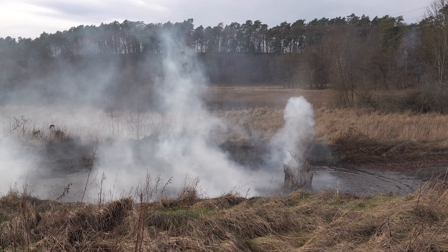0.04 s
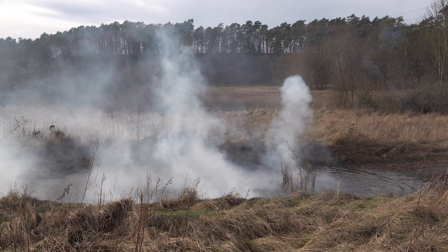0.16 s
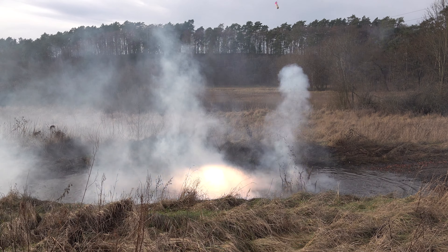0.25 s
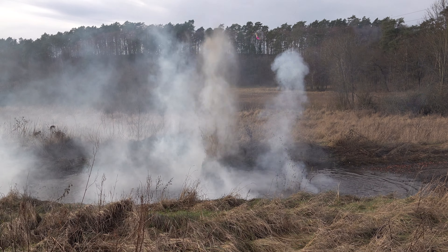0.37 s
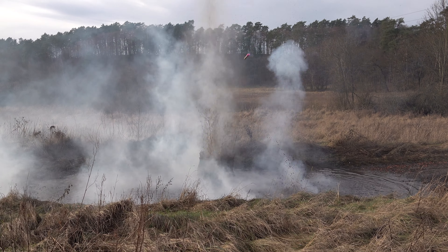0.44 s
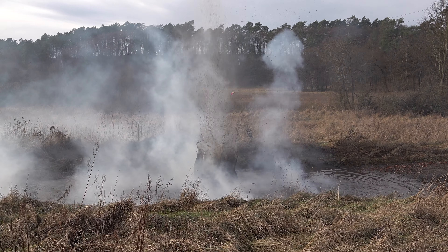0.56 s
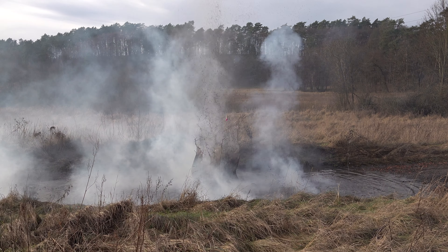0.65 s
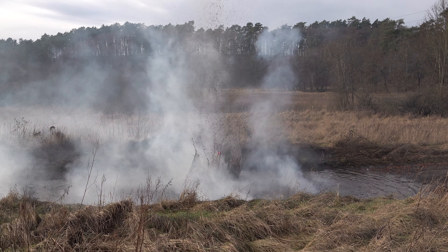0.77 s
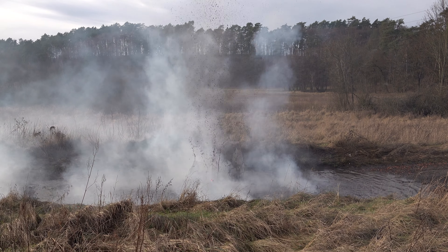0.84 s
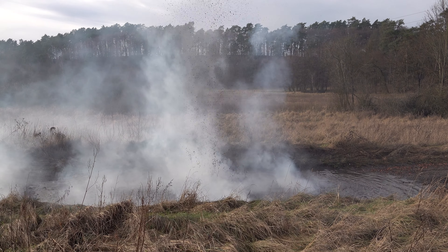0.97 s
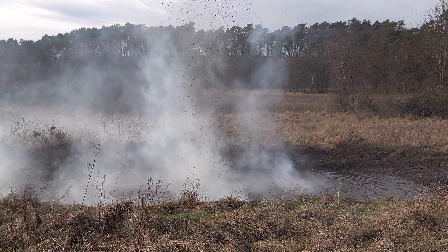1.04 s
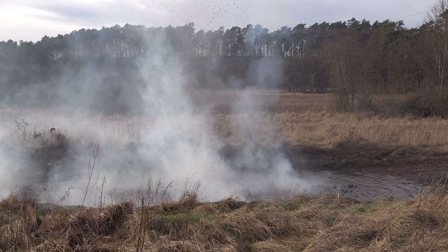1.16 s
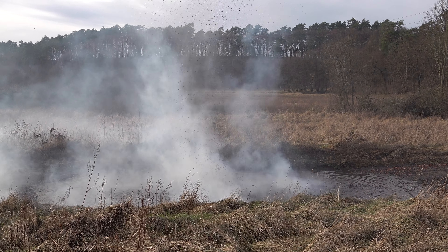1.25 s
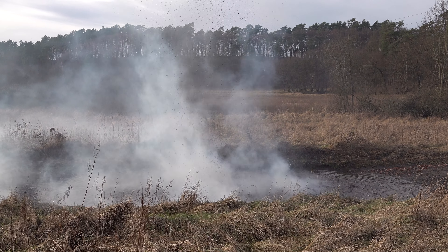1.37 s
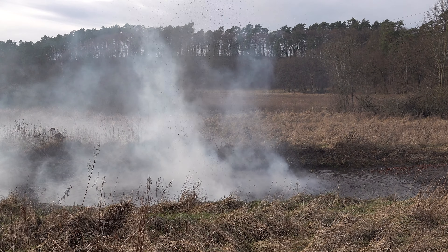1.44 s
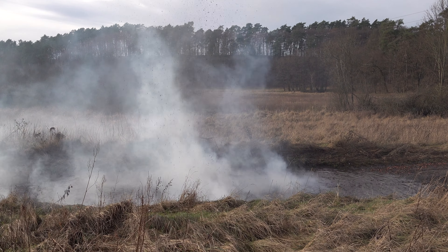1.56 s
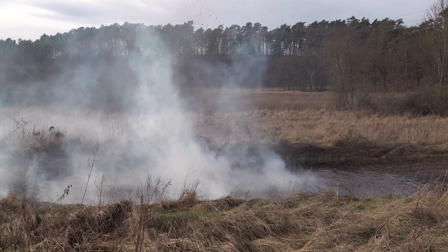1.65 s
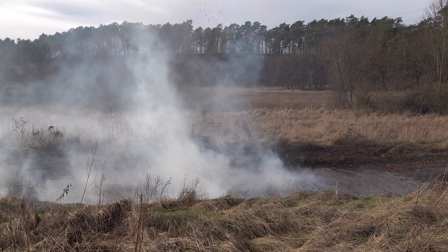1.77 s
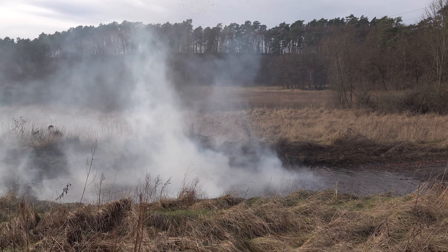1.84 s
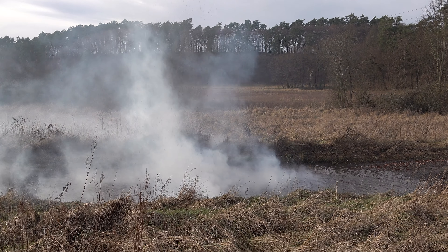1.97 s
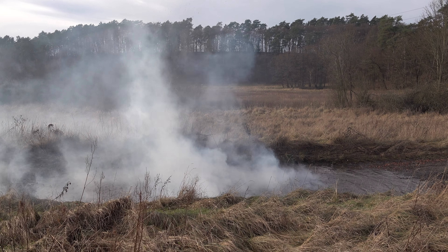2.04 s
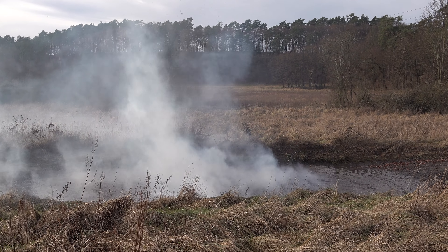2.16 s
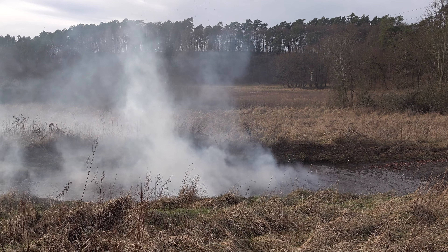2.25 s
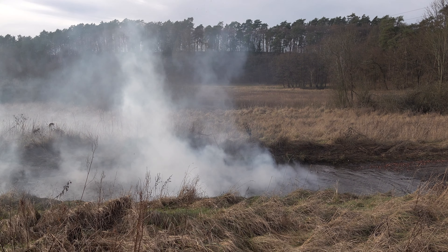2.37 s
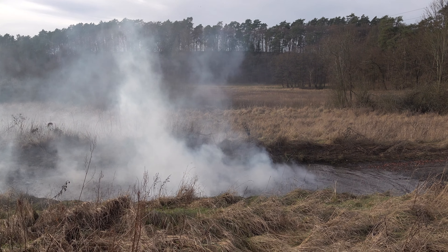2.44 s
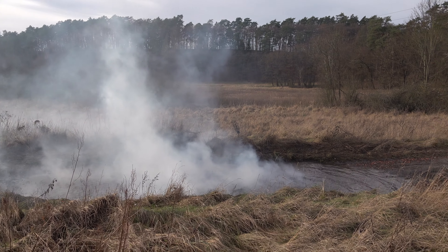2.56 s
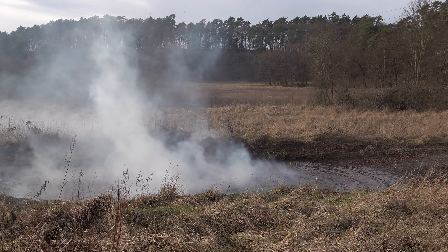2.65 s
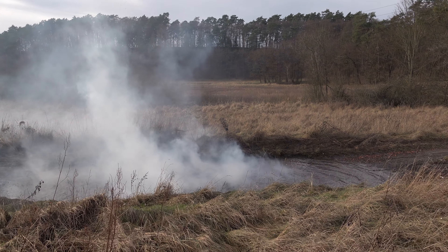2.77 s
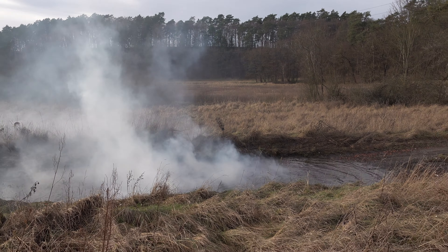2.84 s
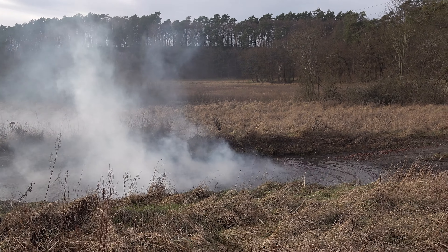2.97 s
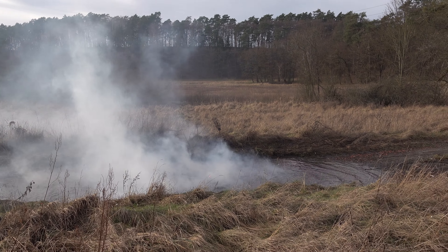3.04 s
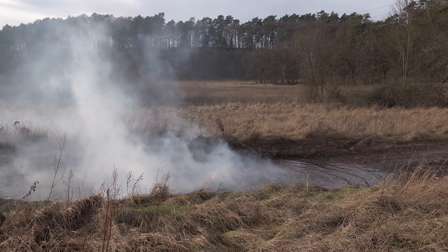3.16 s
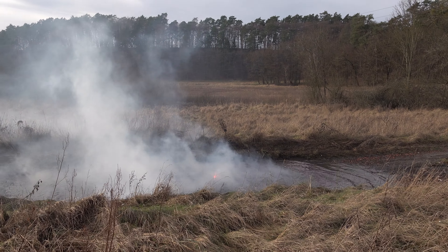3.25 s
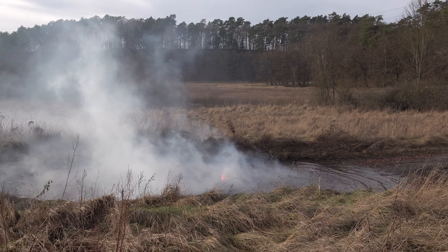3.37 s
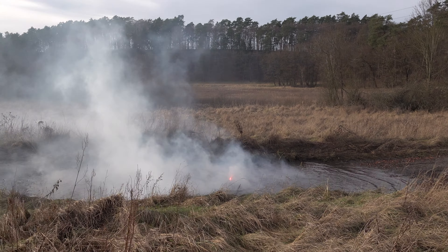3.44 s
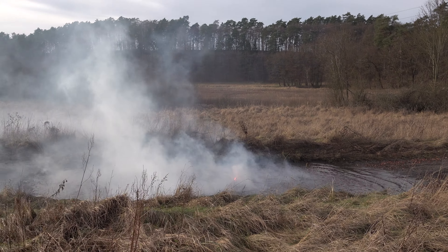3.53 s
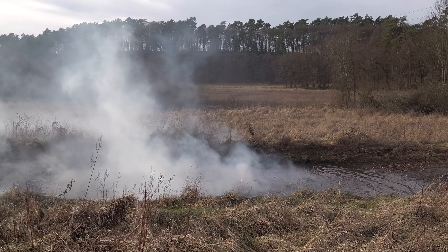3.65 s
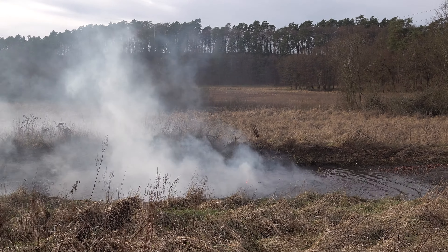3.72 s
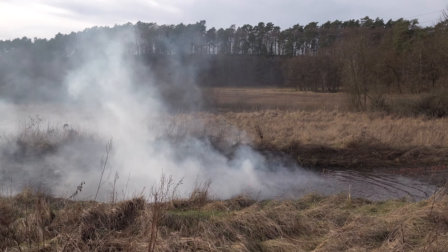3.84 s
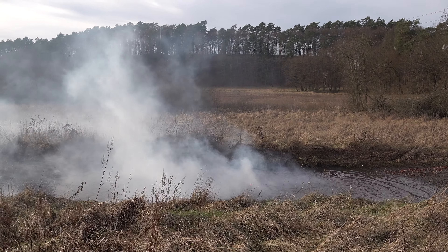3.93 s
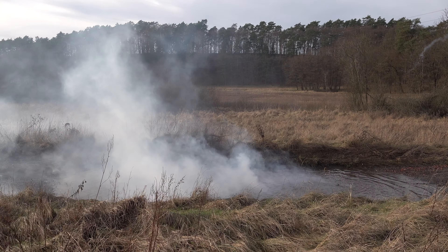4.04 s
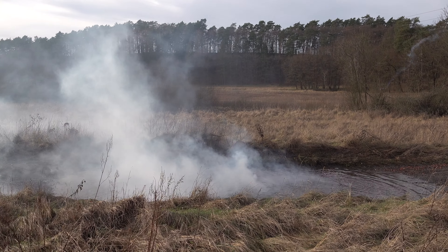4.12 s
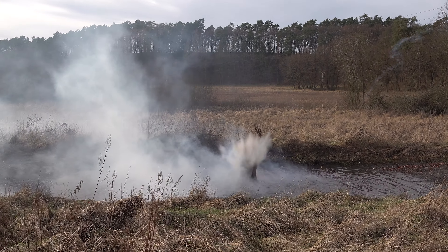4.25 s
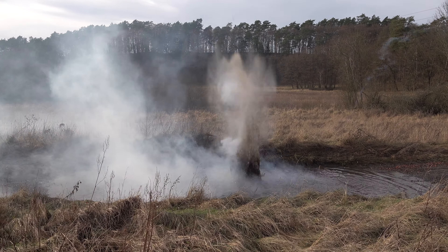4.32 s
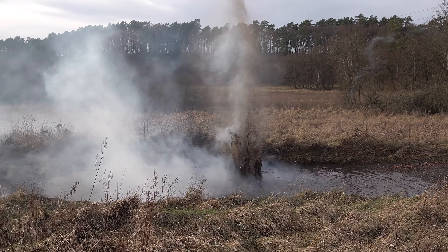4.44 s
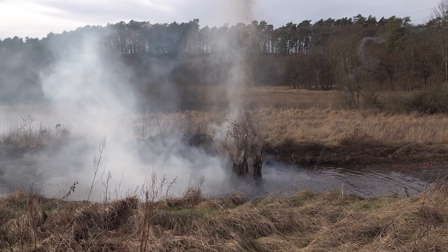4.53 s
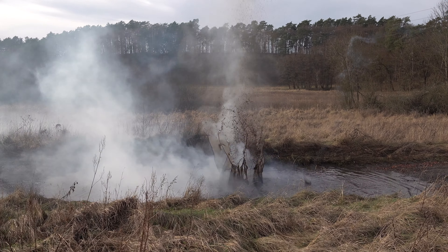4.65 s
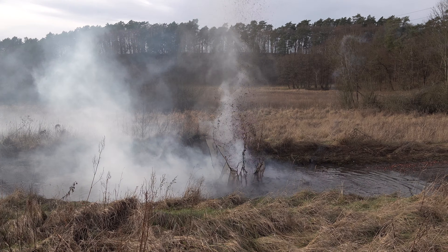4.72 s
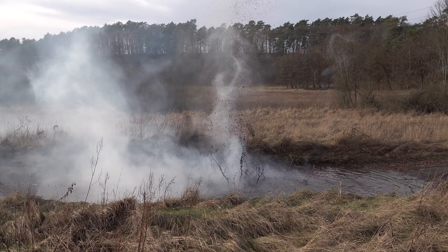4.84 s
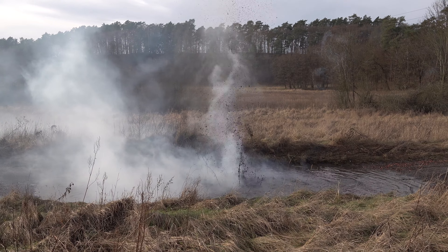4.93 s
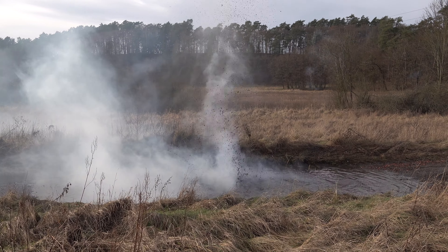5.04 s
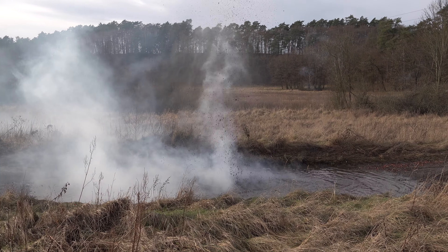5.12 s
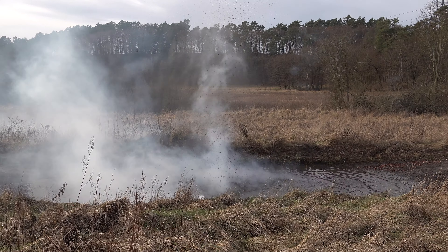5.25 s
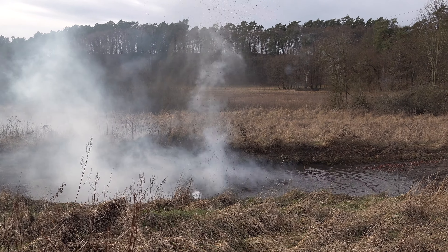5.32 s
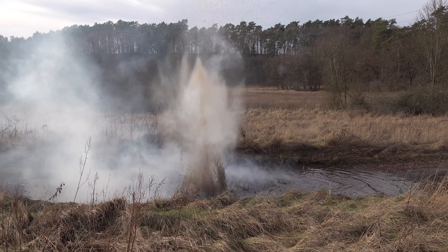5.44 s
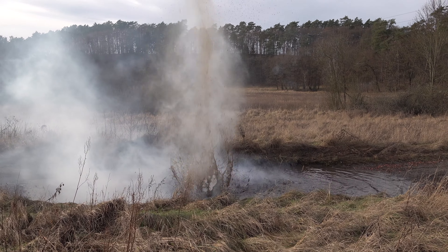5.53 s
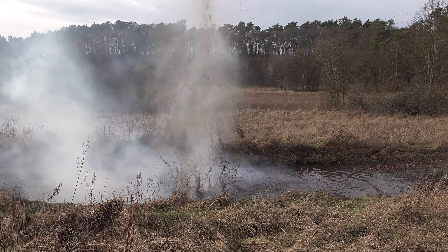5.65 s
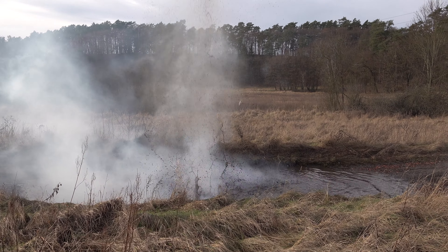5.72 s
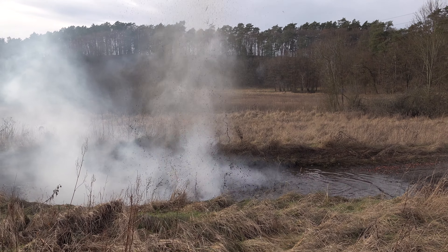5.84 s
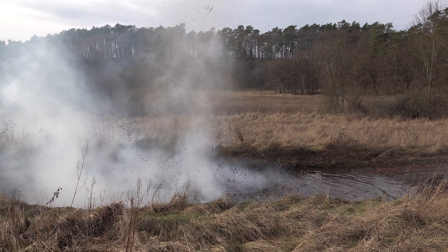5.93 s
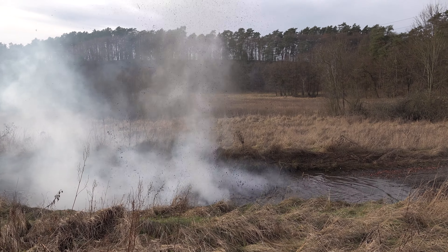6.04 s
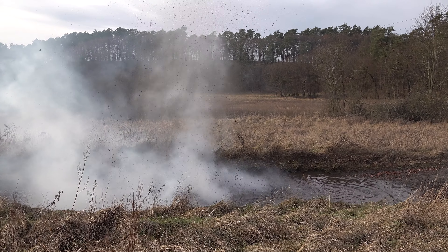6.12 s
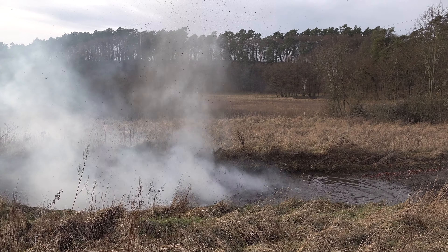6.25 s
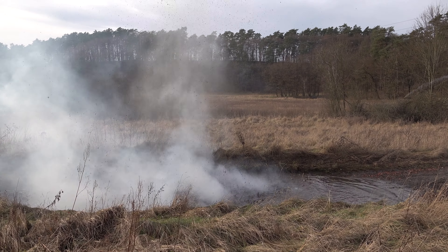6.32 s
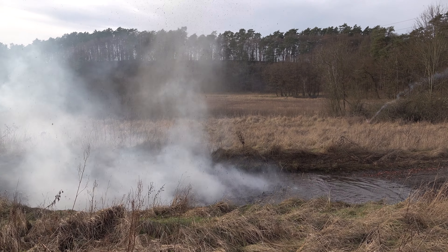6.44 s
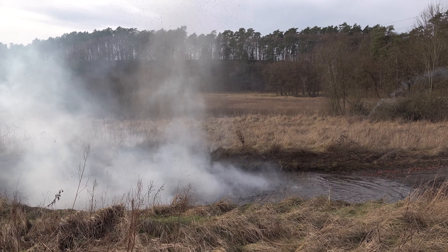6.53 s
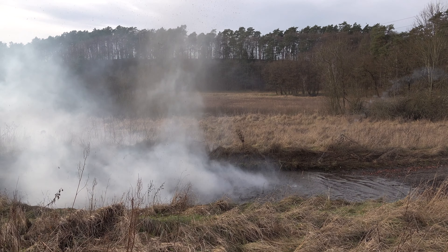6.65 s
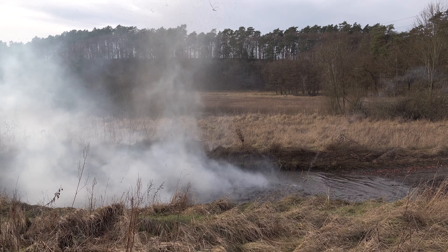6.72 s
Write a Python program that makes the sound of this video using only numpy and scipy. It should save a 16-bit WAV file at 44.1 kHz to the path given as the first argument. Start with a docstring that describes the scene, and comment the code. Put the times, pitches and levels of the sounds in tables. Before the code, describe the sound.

Firecrackers go off in a pond on a meadow surrounded by woods. It opens on the fading crash and echo of a blast just before. At about 0.4 seconds a sharp, loud bang overloads the microphone, slaps back from the forest edge and rolls away with small knocks among the trees. From about 1 to 3 seconds, spray patters softly onto the water, with ticking drops and scattered splats of mud. A faint gust of wind and a tiny fuse fizz come just before a deeper, fuller bang at 3 seconds, which throws several quick echoes. Two more hard cracks follow at about 4.3 and 5.5 seconds, each with a short low boom and a rolling echo that fades. Spray falls again from around 5 seconds to the end, with a couple of distinct mud splats near 6.7 seconds.

```python
"""Firecrackers go off in a pond on a meadow ringed by woods; one has burst just before the start.
Each shock front overloads the microphone with a hard crack, crashes off the banks and reeds, slaps back
from the forest edge and rolls away among the trees, the same trunks knocking back every time.
The water thrown up rains down as spray, drops and splats of mud. Fuses fizz faintly in a light wind."""
import sys
import numpy as np
from scipy import signal
from scipy.io import wavfile

SR = 44100
rng = np.random.default_rng(int(sys.argv[2]) if len(sys.argv) > 2 else 0)


def dump(signal):
    """Clip the signal to [-1, 1] and save it as 16-bit WAV at the path in sys.argv[1]."""
    limited = np.clip(np.atleast_2d(signal).T, -1, 1)
    pcm = np.round(limited * 32767).astype(np.int16)
    wavfile.write(sys.argv[1], SR, pcm)


N = 299439

# Firecrackers and their reflections: t/s, shock push/s, crack f/Hz, extra reed scatter/dB,
# bank scatter/dB, boom/dB, near bank delay/s, its slap/dB, far bank delay/s, its slap/dB,
# forest delay/s, forest level/dB, tree knocks/dB
BLASTS = [(-0.081, 0.0019, 3600, 10, -16, -22, 0.010, -6, 0.065, -6, 0.21, -24.5, -11),
          (0.360, 0.0017, 4240, -2, -14.5, -23.5, 0.009, -9, 0.056, -2.5, 0.209, -26, -13),
          (3.0496, 0.0015, 1200, -17.5, -12, -14.5, 0.0176, -2, 0.073, -1, 0.25, -21, -16),
          (4.3426, 0.00204, 3700, -4, -13.5, -22, 0.0103, -0.5, 0.052, -2.5, 0.209, -26, -13),
          (5.472, 0.0016, 7650, -2, -14.5, -25.5, 0.024, -3.5, 0.059, -8, 0.22, -27, -11)]
# Plumes of water: thrown up at t/s, falling spray level/dB, steady pour/s
PLUMES = [(-1.46, -46, 0.56), (0.27, -54.5, 1), (0.3, -49, 1.0), (4.5, -46, 0.25), (5.5, -50, 0.8)]

STEP = 16   # samples per envelope tick
CLOCK = np.arange(0, N, STEP) / SR
BAND_EDGES = 22 * 2 ** (np.arange(30) / 3)   # third octaves, Hz
CENTRES = np.sqrt(BAND_EDGES[1:] * BAND_EDGES[:-1])


def from_db(db):
    """Decibels to gain."""
    return 10 ** (np.asarray(db) / 20)


def swell(age, db, peak_s, rise_db_per_s, fall_db_per_s, hold_s=0):
    """A power envelope that rises to a level, holds it and dies away."""
    late = age - peak_s
    attack_db = rise_db_per_s * np.minimum(late, 0)
    decay_db = fall_db_per_s * np.maximum(late - hold_s, 0)
    return from_db(db + attack_db - decay_db) ** 2


def add(track, s, sound):
    """Mix in a one-shot, if it starts within the track."""
    start = round(s * SR)
    if 0 <= start < N:
        track[start:start + len(sound)] += sound[:N - start]


def band_power(spectrum, power):
    """Share a power envelope out among the bands by the shape of a spectrum: bands x clock."""
    hz, db = np.transpose(spectrum)
    share = CENTRES * from_db(np.interp(np.log(CENTRES), np.log(hz), db)) ** 2
    return (share / share.sum())[:, None] * power


def flutter(per_s, depth_db):
    """A random gain of mean power 1 that changes so many times a second."""
    knots = rng.standard_normal(N)
    wander = np.interp(np.arange(N) * per_s / SR, np.arange(N), knots)
    gain = from_db(depth_db * np.clip(wander, -2, 2))
    return gain / np.sqrt(np.mean(gain ** 2))


def scatter(power, grain):
    """Countless small arrivals: noise bunched by a shared grain, with a given power in each band."""
    noise = rng.standard_normal((2, N)) * grain
    out = np.zeros(N)
    for k, (low, high) in enumerate(zip(BAND_EDGES, BAND_EDGES[1:])):
        gain = np.repeat(np.sqrt(power[k] * SR / 2 / (high - low)), STEP)[:N]
        band = signal.butter(2, [low, high], "band", fs=SR, output="sos")
        out += signal.sosfilt(band, noise[k % 2] * gain + 1e-18)
    return out


def knock(hz, smear_s, q, rough, top=1.3):
    """A click and a trail of lesser ones through one broad resonance, dulled above top * hz; peak 1."""
    t = np.arange(SR // 25) / SR
    push = rough * rng.standard_normal(len(t)) * np.exp(-t / smear_s)
    push[0] += 1
    w = 2 * np.pi * hz / SR
    r = np.exp(-w / (2 * q))
    ring = signal.lfilter([1, -1], [1, -2 * r * np.cos(w), r * r], push)
    dulled = signal.sosfilt(signal.butter(2, min(top * hz, SR / 3), fs=SR, output="sos"), ring)
    return dulled / np.abs(dulled).max()


def echo(db, hz, smear_s, top=1.55, rough_per_s=28):
    """One reflection of a shock; the longer it is smeared, the more ragged it is."""
    return from_db(db) * knock(hz, smear_s, q=1.8, rough=rough_per_s * smear_s, top=top)


def wind(breeze_db=-63.5, gust_db=-48, gust_s=2.86):
    """A steady breeze and one gust: a bed of low, lumpy rumble that swells once."""
    # Wind spectrum: f/Hz, relative density/dB
    rumble_tone = [(25, 8), (50, 2.5), (100, -8), (300, -14), (1000, -19), (4000, -39), (16000, -36)]
    gust = swell(CLOCK, gust_db, gust_s, rise_db_per_s=21, fall_db_per_s=13)
    blowing = from_db(breeze_db) ** 2 + gust
    return scatter(band_power(rumble_tone, blowing), flutter(per_s=12, depth_db=2.0))


def fuses():
    """Burning fuses flare with a thin, sputtering fizz."""
    # Flares: t/s, level/dB, half length/s
    flares = [(2.952, -54, 0.025), (3.9, -72, 0.07)]
    # Fizz spectrum: f/Hz, relative density/dB
    fizz_tone = [(2000, -40), (6000, -4), (10500, -3), (16000, -10)]
    burning = sum(from_db(db) ** 2 * np.exp(-((CLOCK - s) / half_s) ** 2) for s, db, half_s in flares)
    return scatter(band_power(fizz_tone, burning), flutter(per_s=160, depth_db=5))


def drops(falling, count=420, size_db=4, spread_db=4):
    """Single drops tick on the water at random, as loud as the spray is thick; high ones are softer."""
    out = np.zeros(N)
    for when, size, pitch in rng.random((count, 3)):
        s = when * N / SR
        db = size_db + spread_db * min(-np.log(1 - size), 3) - 5 * pitch
        spray_gain = np.sqrt(np.interp(s, CLOCK, falling))
        tick = knock(2200 * 5 ** pitch, smear_s=0.0027, q=2.5, rough=0.4)
        add(out, s, spray_gain * from_db(db) * tick)
    return out


def spray(flight_s=0.9, rise_db_per_s=14.5, fall_db_per_s=12.5):
    """Each plume patters back on the pond: it thickens for one flight time, pours and thins out."""
    # Spectrum of fine drops on water: f/Hz, relative density/dB
    hiss_tone = [(100, -39), (700, 1), (1500, -0.5), (2800, 2.5), (5300, 3), (8000, -4), (11000, -11),
                 (16000, -15)]
    falling = sum(swell(CLOCK - s, db, flight_s, rise_db_per_s, fall_db_per_s, pour_s) * (CLOCK > s)
                  for s, db, pour_s in PLUMES)
    patter = flutter(per_s=980, depth_db=3.5) * flutter(per_s=120, depth_db=1.2)
    return scatter(band_power(hiss_tone, falling), patter) + drops(falling)


def clods(count=9, first_s=1.3, last_s=2.55, over_spray_db=16, lowest_hz=2000, pitch_span=2.5):
    """Lumps of mud fly highest and splat down late: a few big ones, and lesser ones from every plume."""
    # The biggest clods landing: t/s, peak level/dB, centre f/Hz
    splats = [(1.56, -28, 1720), (1.7668, -28, 3150), (1.8, -24.5, 5700), (1.896, -29, 2000),
              (2.218, -22.5, 3050), (2.3196, -28, 4160), (2.3564, -28, 3600), (2.845, -33, 3410),
              (2.95, -29, 3320), (6.6932, -22, 3070), (6.752, -26, 3800)]
    lesser = []
    for s, db, _ in PLUMES:
        for when, pitch in rng.random((count, 2)):
            landing_s = s + first_s + when * (last_s - first_s)
            lesser.append((landing_s, db + over_spray_db, lowest_hz * pitch_span ** pitch))
    out = np.zeros(N)
    for s, db, hz in splats + lesser:
        add(out, s, from_db(db) * knock(hz, smear_s=0.0021, q=2.0, rough=0.22, top=2.0))
    return out


def woods(edge_db=-0.3, air_db_per_khz_s=3.5, hollow_hz=430, hollow_octaves=0.27, hollow_share=0.42,
          usual_knocks_db=12.5):
    """The wall of trees slaps back, then deeper stands roll on; air dulls the longer paths."""
    # Stands of forest, near to far: peak after the edge t/s, level re forest/dB, rise/(dB/s), fall/(dB/s)
    stands = [(0.012, -2, 602, 171), (0.112, -1.7, 330, 27), (0.72, -10.5, 40, 22), (1.42, -12, 23, 16.5)]
    # Spectrum of the slap off the forest edge: f/Hz, relative density/dB
    edge_tone = [(40, -12), (130, -9), (300, -29), (500, 0), (1000, 0.5), (2800, -3.5), (5500, -12),
                 (9000, -20.5), (16000, -71)]
    # Spectrum of the roll among the trees: f/Hz, relative density/dB
    roll_tone = [(40, -28), (130, -13), (240, -9.5), (340, -0.5), (440, 1), (620, -6.5), (950, -6),
                 (1500, -10.5), (3000, -13), (6000, -24.5), (10000, -56), (16000, -63)]
    hollow = np.exp(-(np.log2(CENTRES / hollow_hz) / hollow_octaves) ** 2)[:, None]
    power = 0
    for s, *_, forest_s, forest_db, knocks_db in BLASTS:
        late = CLOCK - s - forest_s
        air_db = -air_db_per_khz_s * np.outer(CENTRES / 1000, np.maximum(late, 0))
        # the harder a blast makes the trees knock, the hollower its roll
        ring_db = hollow * hollow_share * (knocks_db - forest_db - usual_knocks_db)
        slap = swell(late, forest_db + edge_db, peak_s=0.012, rise_db_per_s=1240, fall_db_per_s=194)
        roll = sum(swell(late, forest_db + db, peak_s, rise, fall) for peak_s, db, rise, fall in stands)
        power += band_power(edge_tone, slap)
        power += band_power(roll_tone, roll * (CLOCK > s)) * from_db(air_db + ring_db) ** 2
    return scatter(power, flutter(per_s=380, depth_db=3.0))


def trunks(count=22, depth_s=1.1, small_db=3, fade_db_per_s=12, spread_db=1.5,
           lowest_hz=480, pitch_span=3.6):
    """Big trees knock back in one pattern every time; lesser ones crackle at random, fading with depth."""
    # Big trees: t/s after the forest edge, level/dB re the blast's knocks, centre f/Hz, smear/s
    trees = [(-0.032, -14.5, 410, 0.0052), (0.012, -11, 1650, 0.003), (0.049, -5.5, 490, 0.0042),
             (0.203, 0.5, 410, 0.0046), (0.246, -6.5, 680, 0.004), (0.404, -9.5, 480, 0.0027)]
    out = np.zeros(N)
    for s, *_, forest_s, forest_db, knocks_db in BLASTS:
        for late_s, db, hz, smear_s in trees:
            add(out, s + forest_s + late_s, echo(knocks_db + db, hz, smear_s, top=1.45))
        for depth, size, pitch in rng.random((count, 3)):
            late_s = depth * depth_s
            db = forest_db + small_db - fade_db_per_s * late_s + spread_db * (2 * size - 1)
            add(out, s + forest_s + late_s, echo(db, lowest_hz * pitch_span ** pitch, smear_s=0.0019))
    return out


def banks(reed_s=0.042, reed_tilt_db=1.2, first_db=6, tail_db=-17, rumble_db=-10,
          wash_db=-1.7, wash_s=0.0075):
    """Reeds and banks answer at once with a low boom and a dense crash that holds until the far bank."""
    # Crash spectrum: f/Hz, relative density/dB
    crash_tone = [(40, -43), (130, -0.5), (280, 5.5), (480, 1.5), (750, -4), (1200, -4.5), (2200, -10),
                  (4000, -14.5), (7000, -21.5), (11000, -31), (16000, -38)]
    # Boom spectrum: f/Hz, relative density/dB
    boom_tone = [(30, -70), (70, -14.5), (115, -4), (165, 1.5), (240, -9), (400, -13), (900, -58),
                 (16000, -85)]
    treble_db = reed_tilt_db * np.log2(CENTRES / 1500)   # thin stems scatter mostly treble
    power = 0
    for s, _, _, reed_db, bank_db, boom_db, _, _, far_s, *_ in BLASTS:
        age = CLOCK - s
        near = np.exp(-np.maximum(age, 0) / reed_s)
        reeds = from_db(np.outer(reed_db + treble_db, near)) ** 2
        first = swell(age, bank_db + first_db, peak_s=0.008, rise_db_per_s=1805, fall_db_per_s=1502)
        wash = swell(age, bank_db + wash_db, peak_s=wash_s, rise_db_per_s=3000, fall_db_per_s=482,
                     hold_s=far_s - wash_s)
        tail = swell(age, bank_db + tail_db, peak_s=far_s, rise_db_per_s=400, fall_db_per_s=74)
        boom = swell(age, boom_db, peak_s=0.01, rise_db_per_s=1500, fall_db_per_s=150)
        rumble = swell(age, boom_db + rumble_db, peak_s=0.037, rise_db_per_s=300, fall_db_per_s=21.0)
        crash = band_power(crash_tone, first + wash + tail) * reeds
        low_end = band_power(boom_tone, boom + rumble)
        power += (crash + low_end) * (age > 0)
    return scatter(power, flutter(per_s=800, depth_db=2.5))


def presence(x, hz=10500, q=0.78, lift=0.19):
    """The microphone port lifts the treble, which sharpens every steep edge."""
    return x + lift * signal.lfilter(*signal.iirpeak(hz, q, fs=SR), x)


def shock(push_s, crack_hz, suction=0.12, suction_s=0.0035, bass_hz=150, bass_q=1.32,
          crack=8, crack_cycles=0.35, thump_db=-29, thump_hz=34, thump_s=0.02):
    """A pressure jump and its suction, squared off by the overloaded capsule, sagging in its bass cut."""
    t = np.arange(SR // 6) / SR
    pressure = np.where(t < push_s, 1, -suction * np.exp(-((t - push_s) / suction_s) ** 2))
    cycles = crack_hz * t
    front = crack * np.exp(-cycles / crack_cycles) * np.cos(2 * np.pi * cycles)   # a brief, wild swing
    squared = np.clip(pressure - front, -1, 1)
    w = 2 * np.pi * bass_hz
    bass_cut = signal.bilinear([1, w / (2 * bass_q), 0], [1, w / bass_q, w * w], SR)
    report = signal.lfilter(*bass_cut, squared)
    # the body of displaced air thumps low and slow
    thump = from_db(thump_db) * np.exp(-t / thump_s) * np.sin(2 * np.pi * thump_hz * t)
    return presence(report) + thump


def firecrackers(reed_smear_s=0.0052, reed_share=0.76):
    """The direct shock of each blast, its slaps off the near and far bank, and glancing echoes."""
    # Glancing echoes, each set off by one blast only: t/s, peak level/dB, centre f/Hz, smear/s
    glances = [(3.054, -4.5, 141, 0.0019), (3.101, -5, 202, 0.0097), (3.2508, -11.5, 170, .003),
               (3.2505, -11, 2050, 0.0043), (3.4922, -13, 1100, 0.0025), (3.548, -14.5, 900, 0.0046),
               (3.605, -17.5, 890, 0.004), (5.542, -9, 1830, 0.0029)]
    out = np.zeros(N)
    for s, push_s, crack_hz, reed_db, _, _, near_s, near_db, far_s, far_db, *_ in BLASTS:
        near_smear_s = reed_smear_s * from_db(reed_share * reed_db)   # thick reeds smear the slap
        add(out, s, shock(push_s, crack_hz))
        add(out, s + near_s, echo(near_db, hz=1360, smear_s=near_smear_s, top=1.76))
        add(out, s + far_s, echo(far_db, hz=2540, smear_s=0.0021, top=1.3))
    for s, db, hz, smear_s in glances:
        add(out, s, echo(db, hz, smear_s))
    return out


def scene():
    """The mono mix: everything as it reaches one microphone."""
    return (firecrackers() + banks() + woods() + trunks() + spray() + clods() + fuses() + wind())[None]


def record(dry):
    """A soft clip flattens the peaks and a steep low-pass cuts the highest treble."""
    ceiling, cutoff_hz = 0.86, 16200
    clipped = dry / (1 + (dry / ceiling) ** 8) ** (1 / 8)
    return signal.sosfilt(signal.ellip(14, .1, 100, cutoff_hz, fs=SR, output="sos"), clipped)


dry = scene()
out = record(dry)
dump(out)
```